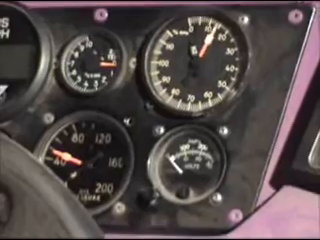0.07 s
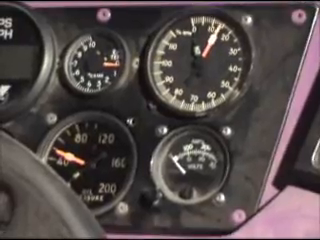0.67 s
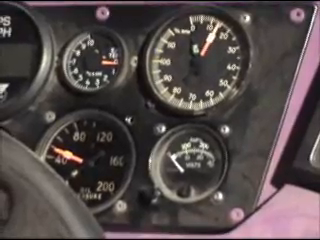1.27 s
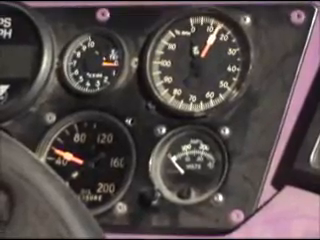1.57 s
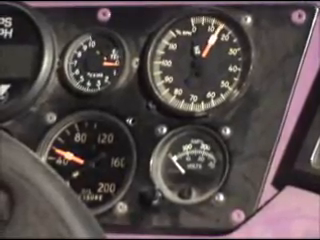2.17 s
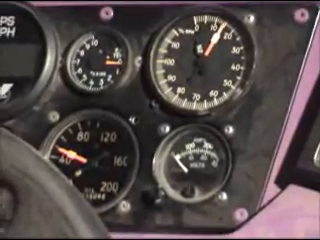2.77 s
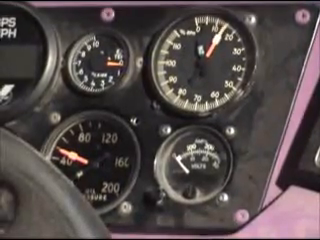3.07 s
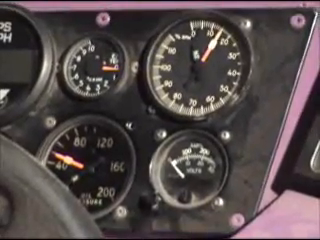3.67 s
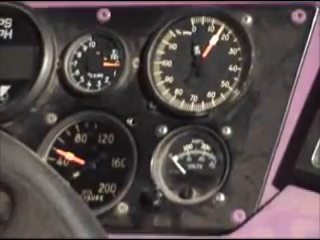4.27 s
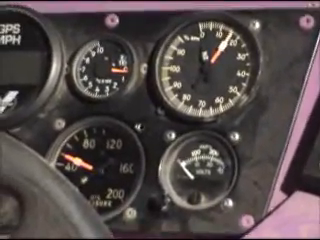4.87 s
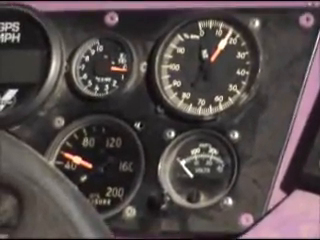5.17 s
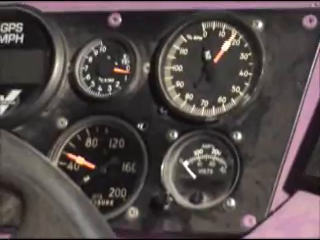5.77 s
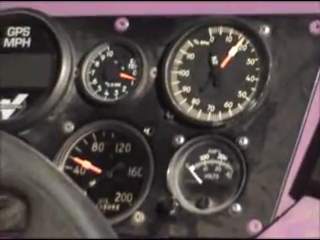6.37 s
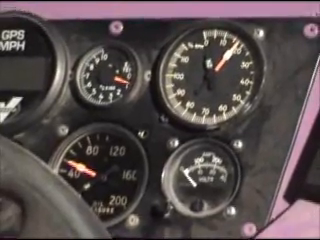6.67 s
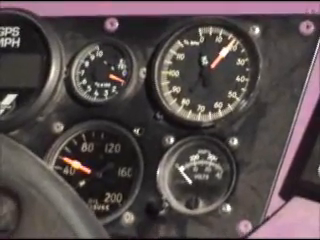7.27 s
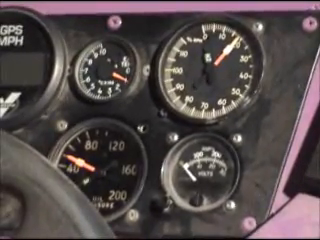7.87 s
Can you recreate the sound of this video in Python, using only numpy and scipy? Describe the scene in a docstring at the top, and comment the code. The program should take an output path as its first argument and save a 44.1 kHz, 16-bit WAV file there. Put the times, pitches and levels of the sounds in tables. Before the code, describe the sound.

A gas turbine is already turning over at the start, heard in stereo from a boat's helm. A piercing high whine creeps up in pitch over a broad roar of air, intake hiss, thinner gear tones and the starter's lower drone. A pump hums underneath at a nearly constant pitch throughout. At about 2.7 seconds the burner lights, adding a low rumble and a deep, uneven throb, while the starter's drone weakens. From about 3 seconds the whine and gear tones climb faster, swelling and fading irregularly as they rise. The strongest surges come between about 5.5 and 7.5 seconds, and the rushing noise ducks briefly beneath them. The hiss grows a little, and the sound narrows toward the centre after 5 seconds. The turbine is still speeding up at the end, around 8 seconds.

```python
"""Gas turbine start, from the helm

A stereo microphone at a boat's helm. The starter winds the shaft up, the burner lights and the spool
climbs faster. The compressor's blade whine rises, surging and fading as it glides through the cockpit's
resonances, over gear tones, rushing air and burner rumble. A pump hums on at nearly constant speed.
The recorder's gain control ducks the whole scene under the loudest surges."""
import sys
import numpy as np
from scipy import signal
from scipy.fft import rfft, irfft, next_fast_len
from scipy.io import wavfile
from scipy.ndimage import uniform_filter1d, map_coordinates

SR = 44100
rng = np.random.default_rng(int(sys.argv[2]) if len(sys.argv) > 2 else 0)


def materialize(psi):
    """Save the field psi as 16-bit PCM at rate SR to the path in sys.argv[1].

    A 1-D psi becomes a single channel; in a 2-D psi each row is a channel.
    """
    bounded = np.clip(np.atleast_2d(psi).T, -1, 1)
    quanta = np.round(bounded * 32767).astype(np.int16)
    wavfile.write(sys.argv[1], SR, quanta)


N = 358091
SIDES = np.array([[1], [-1]])  # left, right


def amp(db):
    """Decibels to gain."""
    return 10 ** (np.asarray(db) / 20)


def unit(x):
    """x at rms 1."""
    return x / np.sqrt(np.mean(np.abs(x) ** 2) + 1e-20)


def blend(levels_db, share):
    """The level that lies share of the way from the first level to the second."""
    return levels_db[0] + share * (levels_db[1] - levels_db[0])


def along(points, hz):
    """Read (frequency, value) points on a log axis."""
    freqs, values = np.transpose(points)
    return np.interp(np.log(hz + 1), np.log(freqs + 1), values)


def curve(rows):
    """One value per sample from (seconds, value) rows."""
    return np.interp(np.arange(N) / SR, *np.transpose(rows))


def wobble(rate):
    """A smooth random curve, rate knots a second."""
    knots = rng.standard_normal(int(N * rate / SR) + 4)
    return map_coordinates(knots, [np.arange(0, N, 32) * rate / SR]).repeat(32)[:N]


def ripple(hz, spacing):
    """A smooth random function of pitch, as reflections add and cancel about every spacing Hz."""
    place = (hz[::32] - hz.min()) / spacing
    return map_coordinates(rng.standard_normal(2048), [place + 2], mode="mirror").repeat(32)[:N]


def filtered(x, response):
    """x times a response of frequency."""
    size = next_fast_len(N + SR // 4)
    return irfft(rfft(x, size) * response(np.fft.rfftfreq(size, 1 / SR)), size)[..., :N]


def angle_of(hz):
    """Running angle of something that turns hz times a second."""
    return 2 * np.pi * np.cumsum(hz) / SR


def hum(hz, waver, width):
    """A stereo tone of rms 1 that wavers in level and phase."""
    angle = angle_of(hz) + rng.uniform(0, 2 * np.pi) + waver * wobble(7)
    return unit((1 + waver * wobble(7)) * np.sin(angle + width * SIDES))


def tone(hz, fade, spacing, width):
    """A stereo tone of rms 1, direct plus reflected: the faster it glides, the faster it flickers."""
    angle = angle_of(hz) + rng.uniform(0, 2 * np.pi)
    sine, cosine = np.sin(angle), np.cos(angle)
    mid = (1 + fade * ripple(hz, spacing)) * sine + fade * ripple(hz, spacing) * cosine
    side = width * ripple(hz, 2 * spacing) * cosine
    return unit(mid + side * SIDES)


# Noise at the microphone. Each row: frequency in Hz, left-right likeness (1 is identical).
LIKENESS = [(40, 0.56), (70, 0.97), (130, 0.84), (300, 1), (1000, 1), (3000, 0.77), (5000, 0.79),
            (9000, 0.69)]


def rush(spectrum, patchy_db):
    """Stereo noise of rms 1 with patches of random gain."""
    def mid_side(hz):
        spread = np.arccos(np.clip(along(LIKENESS, hz), -1, 1)) / 2
        return amp(along(spectrum, hz)) * [np.cos(spread), np.sin(spread)]

    bins = signal.stft(rng.standard_normal((2, N)), nperseg=512)[2]
    patches = uniform_filter1d(rng.standard_normal(bins.shape[1:]), size=6, axis=0)
    patches = uniform_filter1d(patches, size=14, axis=1)
    noise = signal.istft(bins * amp(patchy_db * unit(patches)), nperseg=512)[1][:, :N]
    mid, side = filtered(noise, mid_side)
    return unit(mid + side * SIDES)


# The stereo image of the air and the whine. Each row: time in seconds, side gain.
IMAGE_WIDTH = [(0, 1), (5.1, 1), (5.4, 0.39), (8.12, 0.087)]


def narrowed(pair):
    """The stereo pair, closing towards the centre late in the run-up."""
    mid = pair.mean(axis=0)
    return mid + curve(IMAGE_WIDTH) * (pair - mid)


def reflections(hz, fade, width, spacing):
    """Complex gain at the microphone: the direct path, echoes both sides share and echoes that differ."""
    shared = ripple(hz, spacing) + 1j * ripple(hz, spacing)
    apart = (ripple(hz, spacing) + 1j * ripple(hz, spacing)) * np.sqrt(curve(IMAGE_WIDTH))
    return unit(1 + fade * shared + width * apart * SIDES)


# The cockpit around the microphone. Each row: centre in Hz, width in Hz, lift in dB (negative for
# a notch), left minus right in dB.
COCKPIT_RESONANCES = [(3138, 26, 6, -1), (3180, 11, 6, -1), (3201, 12, 6, -6), (3236, 14, 5, 4),
                      (3275, 9, 10, 2), (3282, 5, -11, 3), (3296, 35, 8, -4), (3368, 11, 8, -6),
                      (3407, 12, 9, -2), (3470, 70, 12, 1), (3550, 19, 6, -6), (3600, 60, 6, 1),
                      (3714, 13, 10, -5), (3768, 70, 10, 2), (3817, 24, 9, 2), (3836, 10, -11, 0),
                      (3853, 12, 5, 3), (3888, 24, 19, -2), (3908, 15, -11, 0), (3943, 15, 8, -2),
                      (3990, 24, -8, 0), (4022, 14, 13, 0), (4036, 12, -11, 0), (4072, 32, 14, 0),
                      (4114, 18, 7, 0), (4136, 14, -6, 0), (4198, 44, 11, 1), (4230, 14, -8, 0),
                      (4260, 13, 12, 0), (4920, 24, 6, -2), (5149, 50, 7, 1), (5373, 14, 7, 0)]


def cockpit(hz):
    """Left and right gain in dB for a gliding tone: it swells in each resonance, sinks in each notch."""
    lift_db = sum((db + SIDES * pan_db / 2) / (1 + (2 * (hz[::32] - centre) / width) ** 2)
                  for centre, width, db, pan_db in COCKPIT_RESONANCES)
    return lift_db.repeat(32, axis=1)[:, :N]


# Noise around the blade tone. Each row: offset from the skirt's centre in Hz, relative density in dB.
EDDY_SKIRT = [(15, 2), (60, -1), (200, -2.5), (400, -19), (900, -23), (2000, -53)]
BLADES = 76
WHINE_DB, EDDY_DB = (-23.5, -23), (-28, -23.5)  # each: cranking, at speed


def compressor(speed, load):
    """Blades chop the intake air: a piercing tone, in a skirt of noise where they cut through eddies."""
    shaft = angle_of(speed)
    blade, hz = BLADES * shaft, BLADES * speed
    flutter = 1 + 0.11 * wobble(45) + 0.022 * wobble(180)  # eddies shake the whine
    flutter += 0.095 * np.sin(shaft)  # a pulse once a turn
    paths = reflections(hz, fade=0.3, width=0.42, spacing=5)
    blade_tone = unit(np.imag(paths * np.exp(1j * (blade + 0.096 * wobble(33)))))
    whine = amp(blend(WHINE_DB, load) + cockpit(hz)) * flutter * blade_tone
    centre = blade + angle_of(np.full(N, 70))  # the skirt sits 70 Hz to the high side
    eddies = rush(EDDY_SKIRT, patchy_db=1.5) * np.sin(centre)
    eddies += rush(EDDY_SKIRT, patchy_db=-1.0) * np.cos(centre)
    return whine + amp(blend(EDDY_DB, load)) * narrowed(eddies)


def blade_buzz(speed, load):
    """No two blades are alike: their pattern repeats each turn, giving a faint comb of shaft orders."""
    orders = np.arange(2049)
    db_by_order = [(55, -27), (78, -0.5), (105, 1), (125, -17), (175, -24), (230, -14.0), (280, -42)]
    strength = amp(along(db_by_order, orders)) * (orders < 280)
    unevenness = rng.standard_normal(len(orders)) + 1j * rng.standard_normal(len(orders))
    pattern = irfft(strength * unevenness)
    turn = np.cumsum(speed) / SR % 1
    buzz = np.interp(turn, np.linspace(0, 1, len(pattern)), pattern)
    return amp(blend((-31, -32), load)) * unit(buzz)


# The starter, heard from the helm. Each row: time in seconds, level in dB.
STARTER_LEVEL = [(0.0, -17), (1.64, -14.5), (2.4, -18), (2.94, -29.5), (3.28, -21.5), (3.54, -26),
                 (3.72, -36), (3.9, -28), (5.12, -19.5), (5.68, -28), (6.45, -36.5), (7.04, -28.5),
                 (8.12, -34)]
STARTER_ORDER = 7.904  # cycles per shaft turn


def starter(speed):
    """The starter's drone, locked to the shaft and loudest while it cranks."""
    return amp(curve(STARTER_LEVEL)) * hum(STARTER_ORDER * speed, waver=0.04, width=0.16)


# The slower gear mesh. Each row: time in seconds, level in dB.
IDLER_LEVEL = [(0.0, -40), (0.64, -27.5), (1.1, -41), (2.8, -34.5), (3.35, -27), (3.75, -37), (3.95, -21),
               (4.26, -35.5), (4.6, -21), (5.1, -32.5), (6.25, -27.5), (6.8, -34.5), (7.2, -29),
               (7.88, -24), (8.12, -30)]
MESH_ORDER, IDLER_ORDER = 98, 40  # tooth contacts per shaft turn
MESH_DB = (-29.5, -26)  # cranking, at speed


def gears(speed, load):
    """Meshing teeth: the main whine glides through the cockpit's resonances, above a lower idler."""
    mesh_hz = MESH_ORDER * speed
    mesh = tone(mesh_hz, fade=0.35, spacing=9, width=0.35)
    idler = tone(IDLER_ORDER * speed, fade=0.33, spacing=8, width=0.52)
    return amp(blend(MESH_DB, load) + cockpit(mesh_hz)) * mesh + amp(curve(IDLER_LEVEL)) * idler


# Weaker rotor and gearbox tones. Each entry: pitch as a multiple of the shaft speed.
ROTOR_ORDERS = [15.808, 23, 23.712, 46, 69, 80, 86, 92, 110, 118, 119, 132, 152, 172, 173, 196, 221]
# Those tones in turn. Each row: level in dB while cranking, level in dB at speed.
ROTOR_LEVELS = [(-40, -40), (-33, -34.5), (-34.5, -39.5), (-37, -37.5), (-37, -54), (-39, -54),
                (-31.5, -33), (-37, -36), (-30.5, -32.5), (-38.5, -38), (-35, -45), (-60, -43),
                (-35.5, -48), (-38, -47), (-44, -50), (-46, -69), (-70, -55)]
# Resonances of the duct. Each row: centre in Hz, width in Hz, lift in dB.
DUCT_RESONANCES = [(831, 40, 16), (992, 22, 7), (1066, 26, 5), (1205, 22, 5), (1248, 20, 6), (1292, 36, 13)]


def rotor_tones(speed, load):
    """Shaft-locked tones, lifted by the duct; their balance shifts as the burner takes the load."""
    out = np.zeros((2, N))
    for order, levels_db in zip(ROTOR_ORDERS, ROTOR_LEVELS):
        hz = order * speed
        lift_db = sum(db / (1 + (2 * (hz - centre) / width) ** 2)
                      for centre, width, db in DUCT_RESONANCES)
        fade = min(order / 90, 1.5)  # short waves scatter most
        gain = amp(blend(levels_db, load) + lift_db)
        out += gain * tone(hz, fade, spacing=12, width=0.17 + 0.087 * fade)
    return out


# The pump's slight climb. Each row: time in seconds, turns per second.
PUMP_TURNS = [(0, 41.8), (1, 41.95), (2, 42.1), (4, 42.39), (6, 42.71), (8.12, 42.99)]
# The pump's harmonics. Each entry: pitch as a multiple of the pump speed.
PUMP_HARMONICS = [1, 2, 3, 4, 5, 6, 10, 15, 20]
# Those harmonics in turn. Each row: level in dB while the turbine cranks, level in dB at speed.
PUMP_LEVELS = [(-58, -60), (-47, -63), (-45, -63), (-55, -53), (-31, -32.5), (-33.5, -41), (-31, -44.5),
               (-25.5, -30.5), (-26.5, -29)]
# A buzzing panel. Each row: pitch in Hz, level in dB.
PANEL_TONES = [(467, -46)]


def pump(load):
    """A pump's hum, carried mostly by every fifth harmonic, and a panel buzzing along."""
    speed = curve(PUMP_TURNS)
    harmonics = sum(amp(blend(levels_db, load)) * hum(order * speed, waver=0.15, width=0.28)
                    for order, levels_db in zip(PUMP_HARMONICS, PUMP_LEVELS))
    panel = sum(amp(db) * hum(np.full(N, hz), waver=0.4, width=0.14) for hz, db in PANEL_TONES)
    return harmonics + panel


# Engine roar and intake hiss at the helm. Each row: frequency in Hz, relative density in dB.
ROAR_SPECTRUM = [(60, -55), (170, -9), (230, -2.5), (300, -4), (390, 3.5), (520, -1.5), (900, -1.5),
                 (1550, -2.5), (1950, -1), (2700, -4), (3700, -4.5), (5200, -15.5), (8000, -39)]
HISS_SPECTRUM = [(2000, -15.5), (3500, -6), (4700, 2), (6000, -2), (7200, -2), (8500, -5.5), (10300, -10.5),
                 (11000, -15.5), (12200, -34)]
ROAR_DB = (-19, -19.5)  # cranking, at speed


def airflow(speed, load):
    """Air roars through the engine and hisses at the intake, the hiss growing with shaft speed."""
    gust_db = 0.59 * wobble(8.3)
    roar = amp(blend(ROAR_DB, load) + gust_db) * rush(ROAR_SPECTRUM, patchy_db=1.0)
    hiss_db = -25 + 0.23 * (speed - speed[0]) + gust_db + 0.21 * wobble(12)
    hiss = amp(hiss_db) * rush(HISS_SPECTRUM, patchy_db=1.0)
    return narrowed(roar + hiss)


# Burner rumble and exhaust throb at the helm. Each row: frequency in Hz, relative density in dB.
RUMBLE_SPECTRUM = [(30, -35), (70, -10), (100, -3.5), (120, -1), (155, 7.5), (180, -7), (215, 6.5),
                   (260, 7), (305, -1.5), (375, -3.5), (480, -10), (900, -54)]
THROB_SPECTRUM = [(20, -20), (36, -5), (47, 5), (62, 3), (80, -2), (110, -12), (200, -46)]
# The throb across the microphone. Each row: frequency in Hz, the left side's lead in radians.
BASS_LEAD = [(30, .8), (55, 0.75), (75, .6), (100, .05)]
LIGHT_OFF_S, CATCH_S = 2.66, 0.25
RUMBLE_DB, THROB_DB = (-39, -29), (-58, -40.5)  # each: unlit, lit


def burner():
    """The flame catches, and an uneven rumble and a deep exhaust throb swell up."""
    lit = np.clip((np.arange(N) / SR - LIGHT_OFF_S) / CATCH_S, 0, 1)
    rumble = amp(blend(RUMBLE_DB, lit) + 0.37 * wobble(9.3)) * rush(RUMBLE_SPECTRUM, patchy_db=1.0)
    throb = amp(blend(THROB_DB, lit) + 2.4 * wobble(7.7)) * rush(THROB_SPECTRUM, patchy_db=0.5)
    return rumble + filtered(throb, lambda hz: np.exp(0.5j * along(BASS_LEAD, hz) * SIDES))


# The turbine shaft's run-up. Each row: time in seconds, turns per second.
SHAFT_TURNS = [(0.0, 41.186), (0.5, 41.62), (1.0, 42.038), (1.5, 42.417), (2.0, 42.776), (2.5, 43.083),
               (2.8, 43.228), (3.1, 43.621), (3.5, 44.43), (4.0, 45.653), (4.5, 46.828), (5.0, 47.975),
               (5.5, 49.193), (6.0, 50.297), (6.5, 51.438), (7.0, 52.584), (7.5, 53.753), (8.12, 54.992)]


def scene():
    """What reaches the helm: one shaft drives all the turbine's tones, over pump, air and flame."""
    speed = curve(SHAFT_TURNS)
    load = np.clip((speed - 43) / 4, 0, 1)  # 0 on the starter, 1 once the flame drives the spool
    blades = compressor(speed, load) + blade_buzz(speed, load)
    drive = starter(speed) + gears(speed, load) + rotor_tones(speed, load)
    return blades + drive + pump(load) + airflow(speed, load) + burner()


def gain_control(x, threshold_db, slope, reaction_s):
    """Takes slope dB off for each dB over the threshold, so the rushing ducks as the whine surges."""
    keep = np.exp(-1 / (reaction_s * SR))
    power = signal.lfilter([1 - keep], [1, -keep], np.mean(x ** 2, axis=0))
    over_db = np.maximum(10 * np.log10(power + 1e-12) - threshold_db, 0)
    return x * amp(-slope * over_db)


def record(dry):
    """The recorder at the helm rides its gain, rounds off peaks and keeps nothing above 12.2 kHz."""
    held = gain_control(dry, threshold_db=-13, slope=0.59, reaction_s=0.036)
    rounded = held / (1 + np.abs(held / 0.95) ** 8) ** (1 / 8)
    return filtered(rounded, lambda hz: hz < 12200)


dry = scene()
out = record(dry)
materialize(out)
```